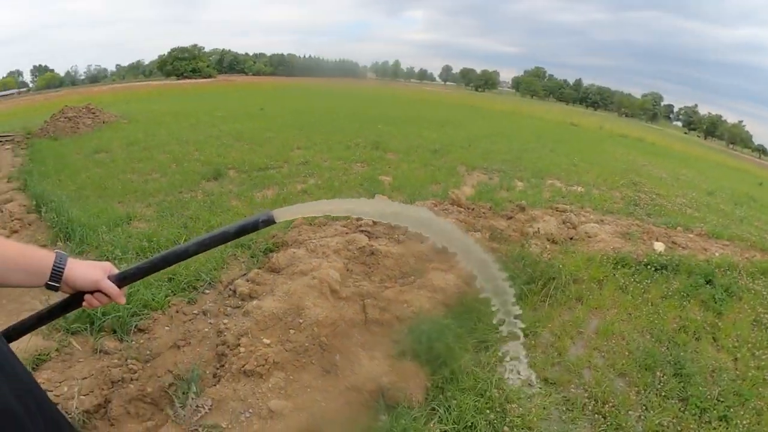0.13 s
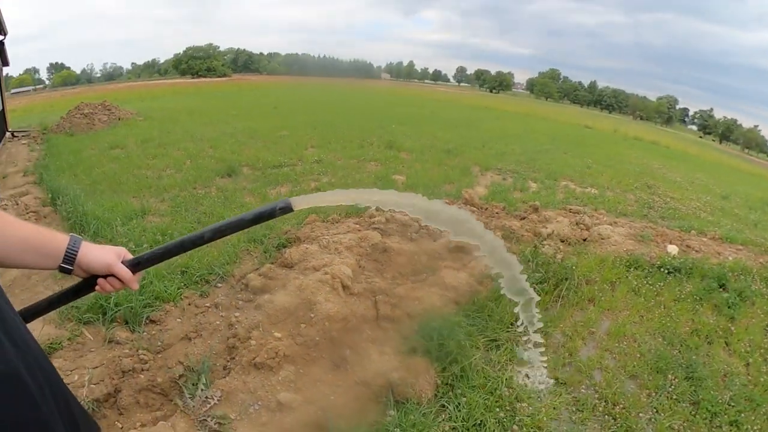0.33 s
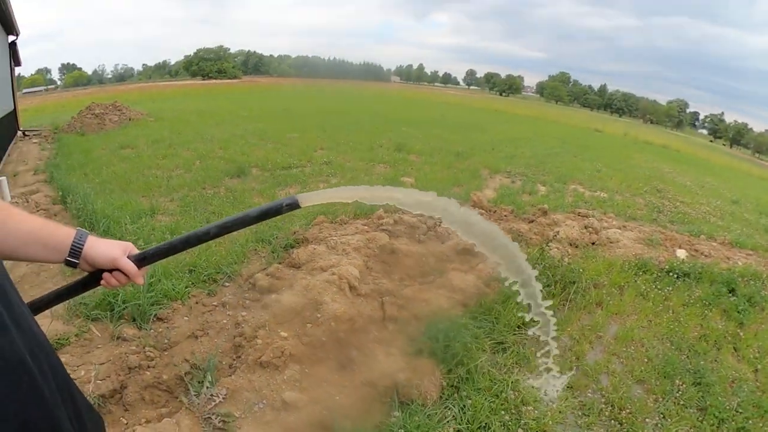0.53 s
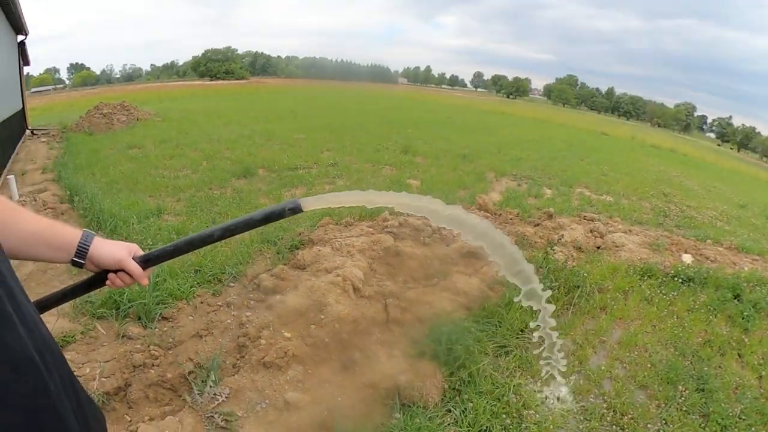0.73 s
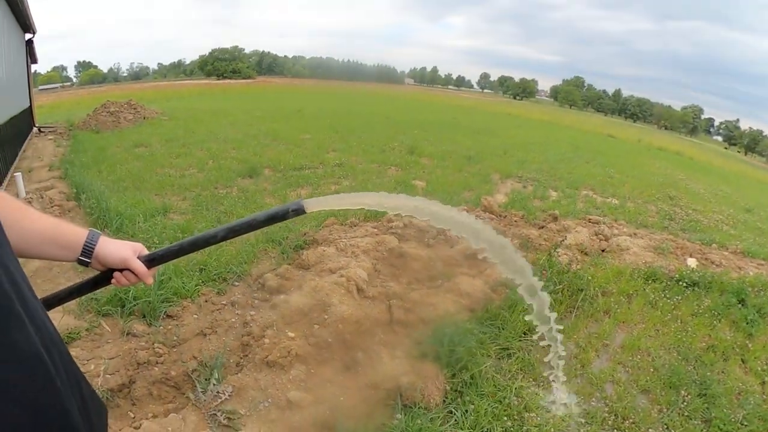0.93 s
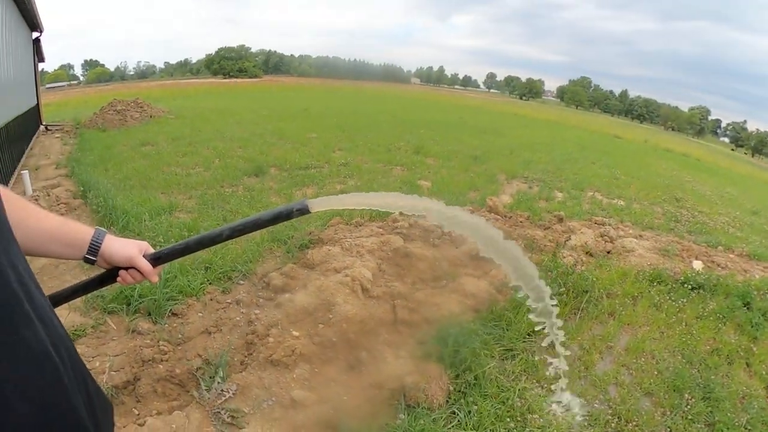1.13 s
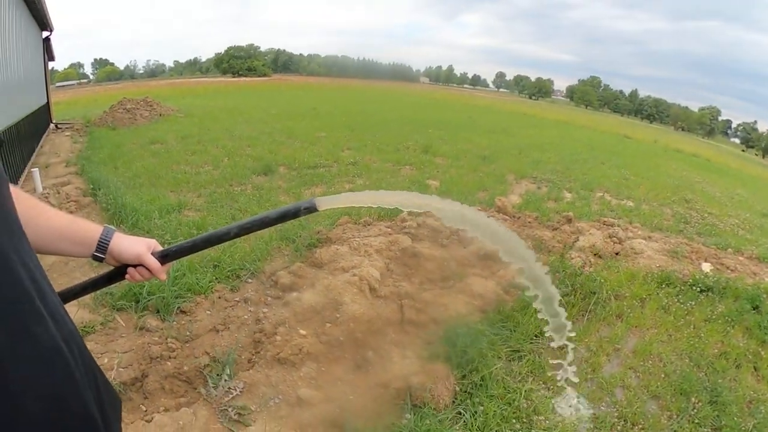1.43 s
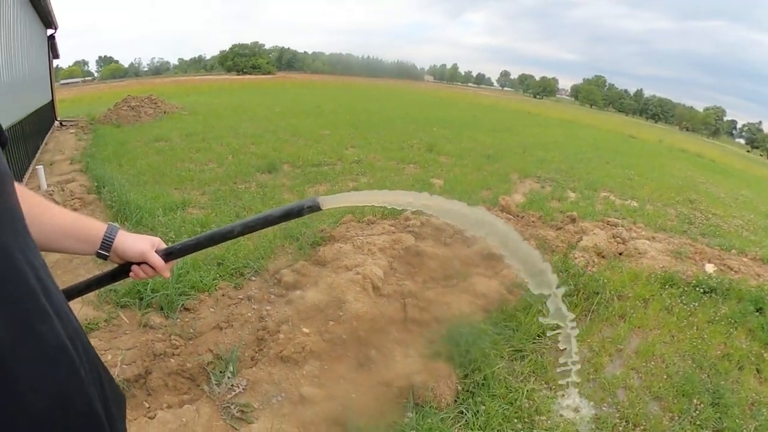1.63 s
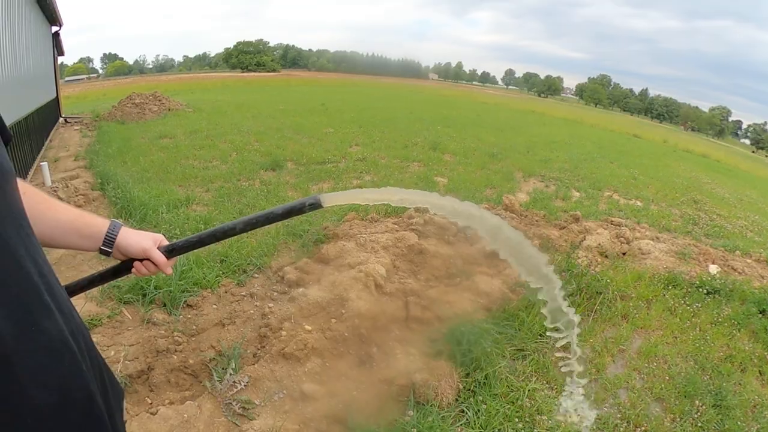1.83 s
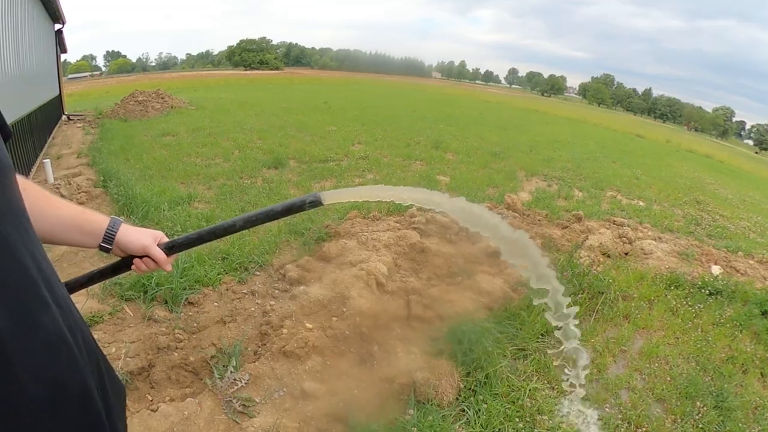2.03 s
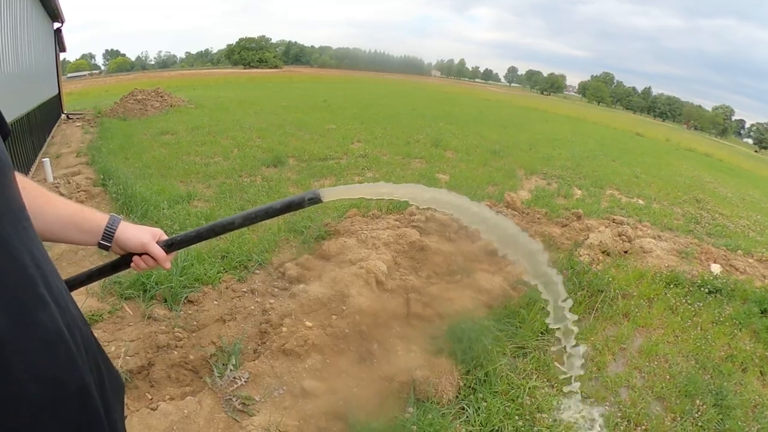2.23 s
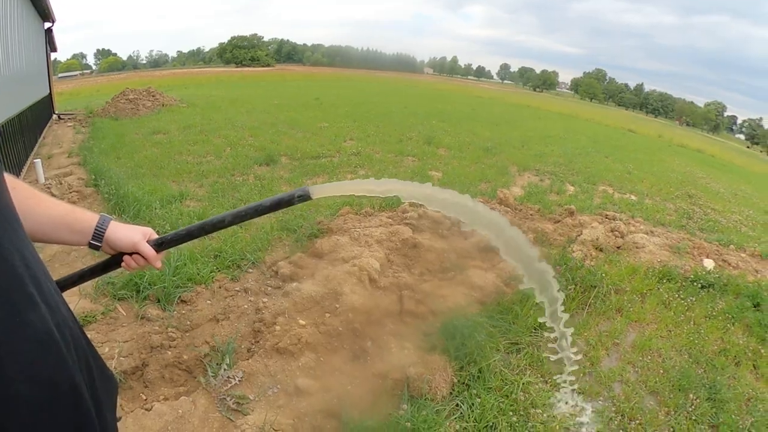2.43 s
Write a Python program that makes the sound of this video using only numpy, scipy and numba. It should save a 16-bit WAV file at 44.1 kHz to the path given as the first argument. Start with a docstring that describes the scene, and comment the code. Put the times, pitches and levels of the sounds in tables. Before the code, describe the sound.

A water jet splatters without pause on grass and dirt a few metres away, its rapid uneven lumps making wet slaps, hollow plops and fizzy spray. Wind rumbles and thumps on the small camera's microphones from about 0.4 s, hardest near 0.8 s, easing after 1.3 s. The stereo image closes to mono around 1.4 s; slightly thinner, puddly splashing continues, with a light puff near 2.25 s, until 2.6 s.

```python
"""Water jet on grass, breezy

A jet of water arcs from a plastic pipe and lands on grass and dirt a few metres from a small camera.
Its slugs gate noise drops into body and spray; heavy splats and bubbles ring as damped, gliding sines.
Wind on the two microphone ports is band-passed noise with short pressure swings.
The stereo image closes to mono by 1.395 s."""
import sys
import numpy as np
from scipy import signal
from scipy.fft import rfft, irfft
from scipy.io import wavfile
from scipy.ndimage import uniform_filter1d
from numba import njit

SR = 44100
rng = np.random.default_rng(int(sys.argv[2]) if len(sys.argv) > 2 else 0)


def dump_mix(stems):
    """Bounce the given channels to the path in sys.argv[1] as a 16-bit WAV at rate SR."""
    frames = np.atleast_2d(stems).T  # one column per channel
    limited = np.clip(frames, -1, 1)  # hard clip at full scale
    pcm = np.round(limited * 32767).astype(np.int16)
    wavfile.write(sys.argv[1], SR, pcm)


def voltage_ratio(level):
    """Linear amplitude factor for a level in decibels (scalar or array-like)."""
    return 10 ** (np.asarray(level, float) / 20)


N = 114660
T = np.arange(N) / SR
OPPOSED = np.array([[1], [-1]])  # plus on the left port, minus on the right

# Water on the ground, before resonances and trim: (time [s], body [dB], spray [dB], treble [dB],
# highest treble [dB])
WATER = [(0, -42, -45.5, -63, -69), (.15, -43.5, -44, -59.5, -73), (.33, -43.5, -46, -59.5, -70),
         (.5, -40.5, -46, -58, -73), (.7, -41, -46, -60.5, -72), (.87, -44.5, -45, -61, -71),
         (1.0, -43, -46, -67, -85), (1.3, -47, -46, -67.5, -87), (1.55, -47.5, -44, -63.5, -79),
         (1.8, -47, -45, -65, -73), (2.1, -46, -45, -64, -71), (2.35, -46.5, -42, -61.5, -69),
         (2.6, -49, -44.5, -65, -71)]
# Flow of body, spray, treble, highest treble: (steady sheet re slugs [ratio],
# share of slugs of its own [0-1], flicker per unit of random walk [dB], smear [s])
SHEET = [(0.73, 0.4, 0.5, 0.00079), (2.04, 0.64, 1.77, 0.0058), (2.4, 0.55, 1.4, 0.0034),
         (1.4, .6, 2.5, .005)]
# Colour of the spray: (frequency [Hz], relative density [dB per Hz])
SPRAY = [(500, -32), (1200, -7), (2000, -3), (2700, -2), (3500, 0), (4700, 0), (6200, -4), (8000, -11),
         (10000, -20.5), (13000, -64)]
# Heaviest splats, before offsets: (time [s], ring level [dB], starting pitch [Hz], spray re usual [dB])
SPLATS = np.array([(0.035, -23.5, 800, -2), (0.095, -24.5, 1180, -5), (0.202, -29, 817, 8),
                   (0.244, -26.5, 780, -6), (0.382, -35, 1810, 0), (0.393, -24.5, 1640, 3),
                   (0.441, -20.5, 1230, 5), (0.455, -27, 620, 0), (0.517, -24, 1120, 2),
                   (0.57, -24, 790, 0), (0.599, -33.5, 826, -10), (0.618, -26, 850, -8),
                   (0.908, -28.5, 832, -6), (0.938, -26.5, 821, 3), (1.054, -28.5, 825, -8),
                   (1.129, -31.5, 850, 0), (1.172, -25, 1430, 3), (1.463, -28, 1550, -2),
                   (1.575, -31, 797, 5), (1.633, -25.5, 1480, 4), (1.679, -31.5, 830, 2),
                   (1.713, -30.5, 780, 6), (1.772, -33, 860, 0), (1.816, -25.5, 1470, -2),
                   (1.838, -39, 826, -2), (2.002, -31, 1420, -10), (2.044, -28, 910, 7),
                   (2.26, -28, 1210, 0), (2.306, -34, 1500, 3), (2.364, -31.5, 888, 4),
                   (2.389, -30, 850, -2), (2.447, -21.5, 1490, -3), (2.529, -26, 1039, 7),
                   (2.552, -25.5, 845, 5)], float)
# Wind on the ports, before offsets: (time [s], rumble [dB], buffeting [dB], side re mid [dB])
WIND = [(0.0, -57, -51, -19), (0.04, -46, -52, -19), (0.29, -42.5, -46.5, -28), (0.43, -25.5, -40.5, -17),
        (0.54, -37.5, -51, -7), (0.56, -43, -42, -15), (0.59, -30, -41, -6), (0.66, -27, -32, -25),
        (0.69, -41.5, -31.5, -22), (0.72, -32, -39, -13), (0.79, -40, -39, -21), (0.82, -23, -17, 7),
        (0.84, -18.5, -27, 8), (0.87, -35, -41, -8), (0.93, -23, -32, -10), (1.05, -39, -39.5, -14),
        (1.11, -28.5, -47, -28), (1.14, -43, -60, -10), (1.19, -41, -32, -25), (1.28, -41.5, -55, 0),
        (1.48, -48.5, -45.5, -1), (1.75, -62, -77, -14), (2.19, -44.5, -59, -5.5),
        (2.24, -43.5, -35.5, -7.5), (2.27, -34.5, -41.5, -8), (2.37, -48, -61, -4), (2.41, -44, -47, -7),
        (2.6, -56, -64, -9)]


def curve(table, col):
    """One column of a table, interpolated over time."""
    return np.interp(T, [row[0] for row in table], [row[col] for row in table])


def unit(x):
    """Scale to rms 1."""
    return x / np.sqrt(np.mean(x ** 2))


def colour(x, points):
    """Minimum-phase filter through (Hz, dB) points, scaled to rms 1."""
    p = np.array(points, float)
    f = np.linspace(1, SR / 2, 2049)
    db = np.interp(np.log(f), np.log(p[:, 0]), p[:, 1], left=p[0, 1] - 20, right=p[-1, 1] - 50)
    cepstrum = irfft(np.log(voltage_ratio(db)))
    # folding the cepstrum onto positive time makes the filter causal
    cepstrum[1:2048] *= 2
    cepstrum[2049:] = 0
    response = irfft(np.exp(rfft(cepstrum)))
    return unit(signal.fftconvolve(x, response)[:N])


def band(x, lo_hz, hi_hz, order=2):
    """Butterworth band-pass."""
    return signal.sosfilt(signal.butter(order, [lo_hz, hi_hz], "band", fs=SR, output="sos"), x)


def walk(rate):
    """Random levels held 1 / rate s and slewed twice."""
    hold = int(SR / rate)
    steps = rng.standard_normal(N // hold + 1)
    return uniform_filter1d(uniform_filter1d(np.repeat(steps, hold), hold), hold)[:N]


def burst(kicks, rise_s, fall_s):
    """Each kick swells and dies away."""
    t = np.arange(int(.12 * SR)) / SR
    envelope = np.exp(-t / fall_s) * (1 - np.exp(-t / rise_s))
    return signal.fftconvolve(kicks, envelope)[:N]


@njit
def grains(at, hz, cycles, glide, size, n):
    """Damped sines that fall by a factor e in the given cycles; a positive glide lifts their pitch."""
    out = np.zeros(n)
    for k in range(len(at)):
        z, w = size[k] + 0j, 2 * np.pi * hz[k] / SR
        fade = hz[k] / SR / cycles
        for i in range(int(at[k]), min(n, int(at[k] + 6 / fade))):
            out[i] += z.imag
            z *= np.exp(1j * w - fade)
            w *= 1 + glide * fade
    return out


def scatter(per_s, scatter_db):
    """Sparse kicks at random times, a few much larger than the rest."""
    hit = rng.random(N) < per_s / SR
    excess = np.minimum(rng.exponential(size=N), 4.0)
    return hit * voltage_ratio(scatter_db * excess)


def hail():
    """Drops strike as noise, with sparse stronger samples for the larger ones."""
    return rng.standard_normal(N) * (1 + scatter(per_s=2500, scatter_db=2.5))


def slugs():
    """The jet breaks into lumps that land at uneven intervals while the flow stays even."""
    slugs_per_s, jitter, scatter_db, even_s = 55, .55, 3, .09
    c = rng.standard_normal((600, 2))
    gaps = np.exp(jitter * c[:, 0]) / slugs_per_s
    at = (np.cumsum(gaps) * SR).astype(int)
    kicks = np.zeros(N)
    kicks[at[at < N]] = voltage_ratio(scatter_db * c[at < N, 1])
    lumps = burst(kicks, rise_s=0.003, fall_s=0.0045)
    k = int(even_s * SR)
    mean_flow = uniform_filter1d(uniform_filter1d(lumps, k), k)
    return lumps / (mean_flow + lumps.mean() / 10)


def lull(at_s):
    """The stream thins just before each heavy splat."""
    lull_s, lull_db = .010, -5
    thin = sum((T > a - lull_s) & (T < a) for a in at_s)
    return voltage_ratio(lull_db * np.minimum(thin, 1))


def splat(at_s, db):
    """A heavy splat throws out water in a quick swell that dies away."""
    kicks = np.zeros(N)
    kicks[(at_s * SR).astype(int)] = voltage_ratio(db)
    return burst(kicks, rise_s=0.001, fall_s=0.0038)


def stream(lumps, dip):
    """Steady sheet, slugs and heavy splats gate drops through four colours, from body to highest treble."""
    # colours: (frequency [Hz], relative density [dB per Hz])
    body_colour = [(250, -27.5), (400, -11.5), (550, -3.5), (800, -0.5), (1050, -4), (1500, -0.5),
                   (2100, -6.5), (3200, -13), (6000, -24.5), (10000, -51)]
    treble_colour = [(6000, 3), (9000, 10.5), (11000, 10.5), (12500, 8), (14500, -21)]
    air_colour = [(10500, -22), (12300, -2), (13500, -3), (15500, -10)]
    at_s, ring_db, _, spray_db = SPLATS.T
    blow = splat(at_s, (ring_db - ring_db.mean()) / 2 + 5)
    splash = splat(at_s, spray_db + 12)
    colours = [body_colour, SPRAY, treble_colour, air_colour]
    out = 0
    for k, (points, (sheet, own, flicker_db, smear_s)) in enumerate(zip(colours, SHEET)):
        landing = (1 - own) * lumps + own * slugs() * dip
        flow = sheet * dip ** .5 + landing + (splash if k else blow)
        flow = uniform_filter1d(flow, 1 + int(smear_s * SR))
        flow = flow * voltage_ratio(flicker_db * walk(40.05))
        out = out + voltage_ratio(curve(WATER, k + 1)) * colour(flow * hail(), points)
    return out


def bubbles(lumps, per_s, db, scatter_db, low_hz, octaves, cycles, tilt_db=0):
    """Bubbles ring with rising pitch, thickest where lumps land; tilt_db is per octave."""
    c = rng.random((int(per_s * N / SR), 3))
    at = np.interp(c[:, 0] * lumps.sum(), np.cumsum(lumps), np.arange(N))
    up = octaves * c[:, 1]
    size = voltage_ratio(db + tilt_db * up - scatter_db * np.log(c[:, 2] + 1 / 30))
    rings = grains(at, low_hz * 2 ** up, cycles, 0.052, size, N)
    return band(rings, 472, 9650, order=3)  # what carries across the grass


def plops(lumps):
    """Short, strongly damped bubbles plop where the slugs land."""
    return bubbles(lumps, per_s=350, db=-44, scatter_db=2.5, low_hz=602, octaves=1.796, cycles=1.17)


def fizz(lumps):
    """Small, high bubbles ring longer and also sound between slugs."""
    return bubbles(1 + lumps, per_s=790, db=-53, scatter_db=3.5, low_hz=1822, octaves=2.2,
                   cycles=19.2, tilt_db=-1)


def ground_resonance(water_sound):
    """Every splash rings narrow resonances, which shift in level between about 0.67 and 1.4 s."""
    # (frequency [Hz], width [Hz], early level [dB], late level [dB])
    resonances = [(693, 13, -0.5, -5.5), (834, 18.4, 4, 0.5), (1180, 47, -2, -5.5), (1503, 66, -30, -0.5),
                  (1890, 44, -11, -9), (2274, 33, -17, -5.5), (2570, 72, -10.5, -15), (3050, 44, 0, -4),
                  (4380, 130, -14, -14), (4880, 52, -7.5, -15)]
    shift_from_s, shift_s = 0.67, 0.73
    late = np.clip((T - shift_from_s) / shift_s, 0, 1)
    out = water_sound
    for hz, width, early_db, late_db in resonances:
        gain = voltage_ratio(early_db + late * (late_db - early_db))
        out = out + gain * band(water_sound, hz - width / 2, hz + width / 2, order=1)
    return out


def splat_rings():
    """Heavy splats ring just after the hit, as damped sines of rising pitch."""
    at_s, ring_db, hz, _ = SPLATS.T
    lag_s = 0.001634
    rings = grains((at_s + lag_s) * SR, hz, 2.67, 0.0177, voltage_ratio(ring_db - 4.5), N)
    return band(rings, 267, 4600)


def ground_thud(lumps):
    """The jet's weight on the ground: low noise that swells with the slugs."""
    # (frequency [Hz], relative density [dB per Hz])
    thud_colour = [(30, -18), (60, -22), (170, 0.5), (260, -8.5), (400, -54), (600, -17)]
    return voltage_ratio(-56.5) * colour((2.3 + lumps) * rng.standard_normal(N), thud_colour)


def spray_side(lumps):
    """Spray that differs between the ports, mostly in the treble."""
    # before filtering: (time [s], side re mid [dB])
    side_levels = [(0, -19), (.15, -16), (.34, -11), (.4, -5), (.6, -3.5), (.85, -13), (1.05, -18),
                   (1.15, -30), (2.6, -50.5)]
    spray = colour((SHEET[1][0] + lumps) * hail(), SPRAY)
    spray = spray * voltage_ratio(curve(WATER, 2) + curve(side_levels, 1))
    treble = band(spray, 6500, 10200, order=6)
    middle = 3 * voltage_ratio(-24) * band(spray, 900, 2600, order=1)
    return treble + middle


def water():
    """Stream and bubbles excite the ground; splat rings, thud and side spray join them."""
    dip = lull(SPLATS[:, 0])
    lumps = slugs() * dip
    wash = stream(lumps, dip) + plops(lumps) + fizz(lumps)
    centre = voltage_ratio(-2.5) * ground_resonance(wash) + splat_rings() + ground_thud(lumps)
    return centre + spray_side(lumps) * OPPOSED


def even(x):
    """Flatten the swings of a signal's envelope."""
    return unit(x / (np.abs(signal.hilbert(x)) + 0.62))


def gust(rumble_db, buffet_db, tail_db):
    """Eddies press on a port: slow rumble, quicker buffeting and its higher tail."""
    rumble_hz, buffet_hz, tail_hz = 35.6, 118, 305
    eddies = voltage_ratio(5 * walk(30))
    rumble_noise = band(rng.standard_normal(N), rumble_hz / 2.1, rumble_hz * 1.86)
    rumble = even(unit(rumble_noise))
    noise = rng.standard_normal(N)
    tail = unit(eddies * band(noise, tail_hz / 1.43, tail_hz * 1.68, order=3))
    buffet_noise = band(noise, buffet_hz / 1.62, buffet_hz * 1.438, order=3)
    buffet = unit(eddies * even(unit(buffet_noise)))
    slow = voltage_ratio(curve(WIND, 1) + rumble_db) * rumble
    quick = voltage_ratio(curve(WIND, 2)) * (voltage_ratio(buffet_db) * buffet + voltage_ratio(tail_db) * tail)
    return band(slow + quick, 15, 700)


def wind():
    """Wind common to both ports, plus a separate gust of opposite sign on each."""
    common = gust(rumble_db=0.21, buffet_db=-4.0, tail_db=-20)
    side_gain = voltage_ratio(np.minimum(curve(WIND, 3), -5))  # held to a ceiling
    side = side_gain * gust(rumble_db=-4.5, buffet_db=2.5, tail_db=-8)
    return common + side * OPPOSED


def swing(at_s, db, hz):
    """Pressure swings and dies within a few cycles at constant pitch."""
    return band(grains(at_s * SR, hz, 0.95, 0., voltage_ratio(db), N), 23, 400)


def puffs():
    """The hardest puffs swing the pressure, unequally on the two ports."""
    # before filtering and the added side swing:
    # (time [s], level [dB], pitch [Hz], left minus right [dB])
    puff_table = [(0.42, -20.5, 67, -3), (0.456, -30.5, 62, 13), (0.597, -35, 82, 11), (0.648, -22, 62, -2),
                  (0.677, -23, 88, 11), (0.758, -34.5, 102, 24), (0.815, -15, 128, -8),
                  (0.847, -25, 62.7, -5), (0.929, -29, 103, 3), (0.998, -32, 77, 11), (1.096, -31.5, 85, 1),
                  (1.161, -37, 152, -6), (1.194, -24.5, 104, -7.5), (1.433, -31, 90, -2),
                  (2.233, -29, 152, 0), (2.252, -50, 61.9, -4)]
    at_s, db, hz, left_db = np.array(puff_table, float).T
    ports = np.array([swing(at_s, db + left_db / 2, hz), swing(at_s, db - left_db / 2, hz)])
    side = swing(at_s, db - 5.5, 1.32 * hz)
    return ports + side * OPPOSED


def scene():
    """Water ahead and wind on both ports, closing to mono."""
    mono_from_s, mono_fade_s = 1.395, 0.059
    ports = water() + wind() + puffs()
    mid = ports.mean(axis=0)
    stereo = np.clip((mono_from_s - T) / mono_fade_s, 0, 1)
    return mid + stereo * (ports - mid)


def top_cut(x):
    """Nothing passes above the cut-off."""
    return signal.sosfilt(signal.butter(12, 15620, fs=SR, output="sos"), x)


def record(dry):
    """The small camera takes down the finished mix of its two ports."""
    return top_cut(dry)


dry = scene()
out = record(dry)
dump_mix(out)
```